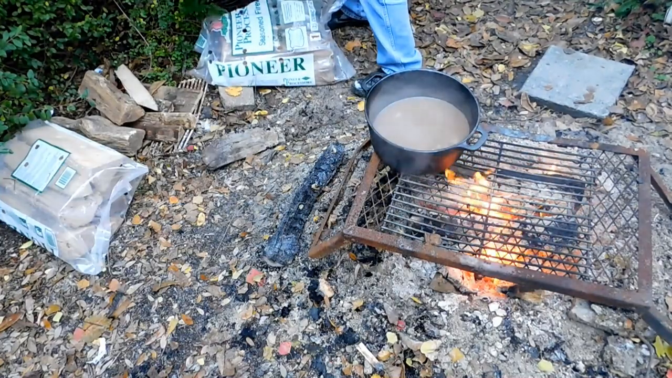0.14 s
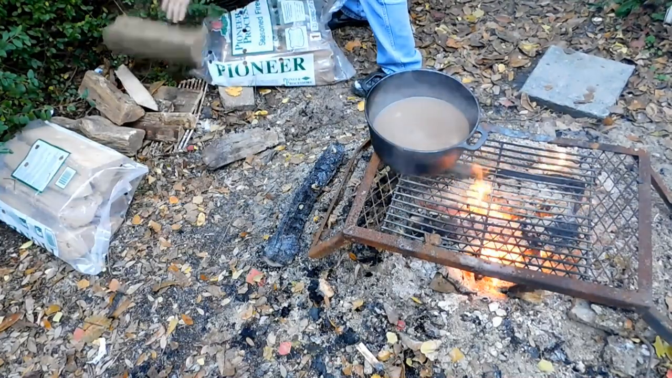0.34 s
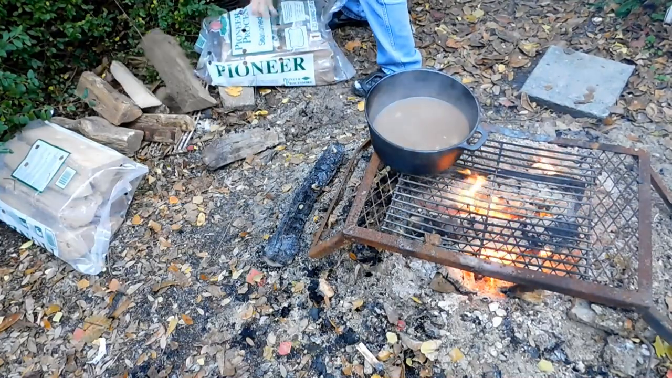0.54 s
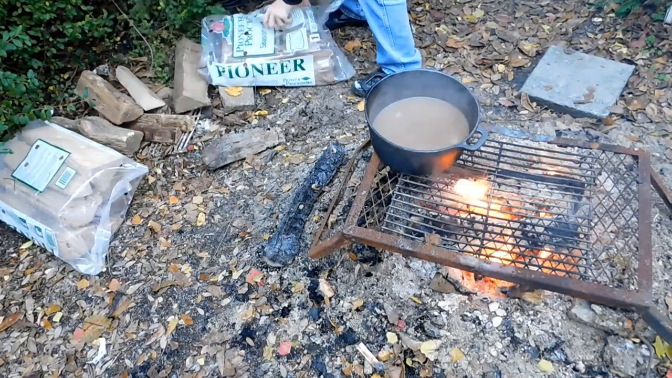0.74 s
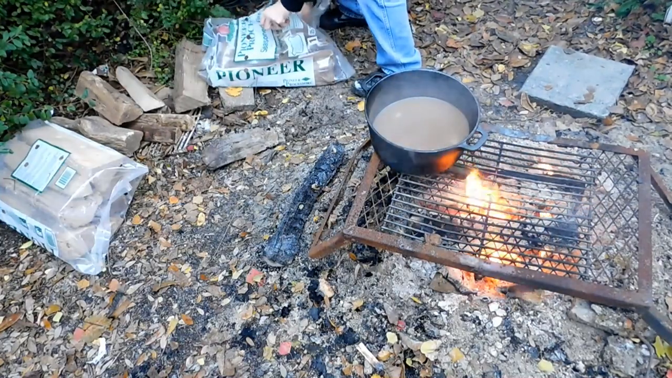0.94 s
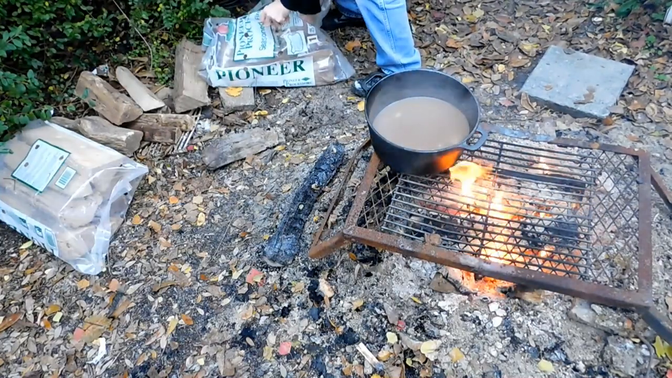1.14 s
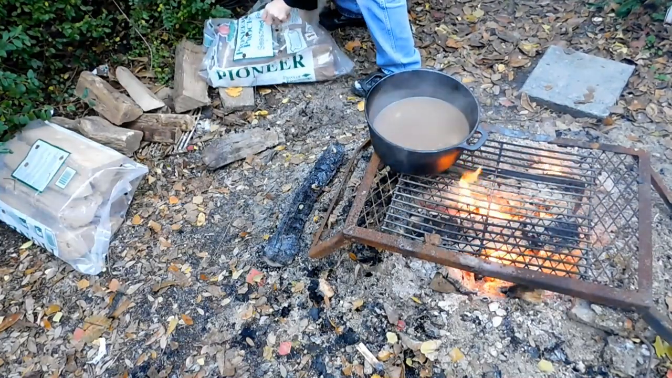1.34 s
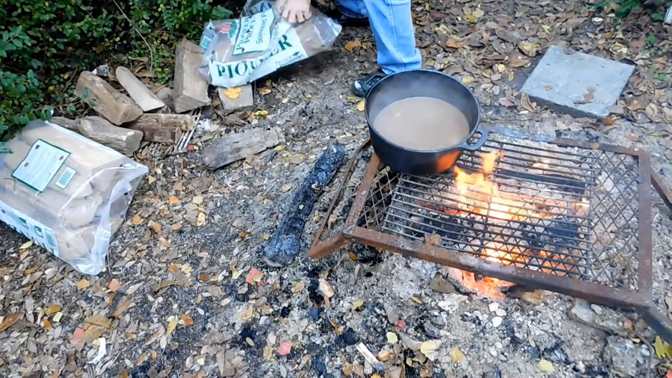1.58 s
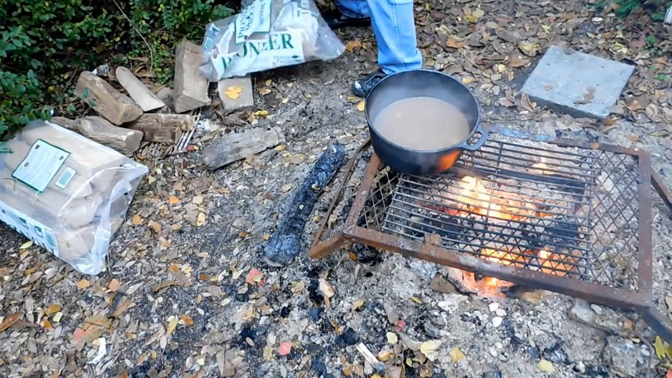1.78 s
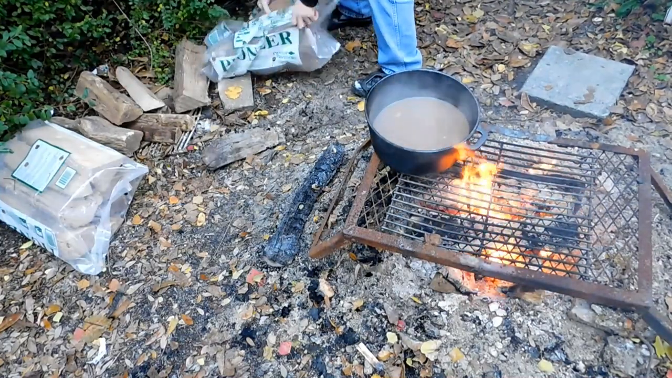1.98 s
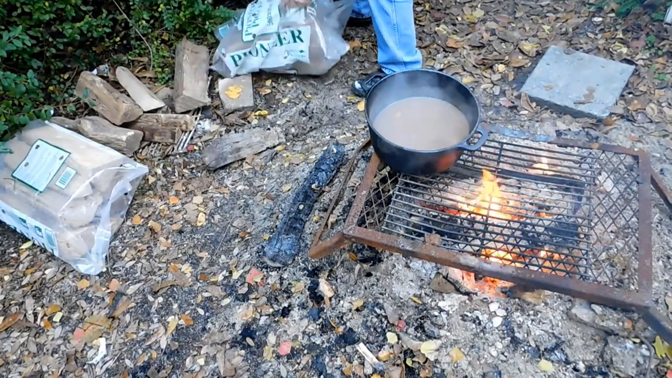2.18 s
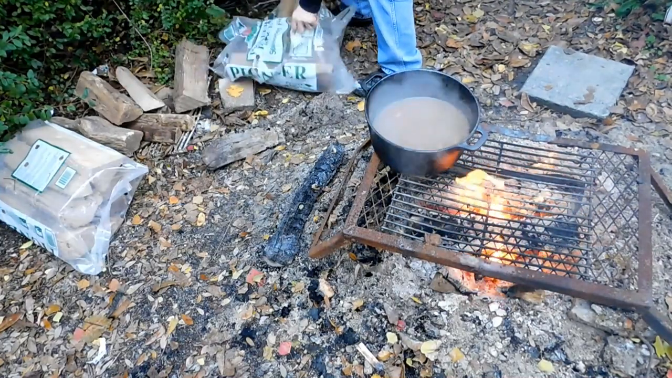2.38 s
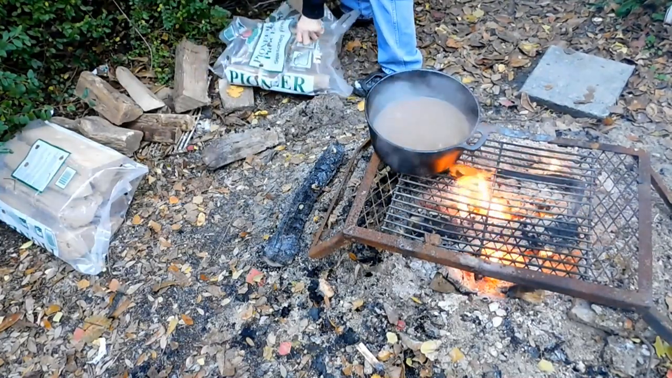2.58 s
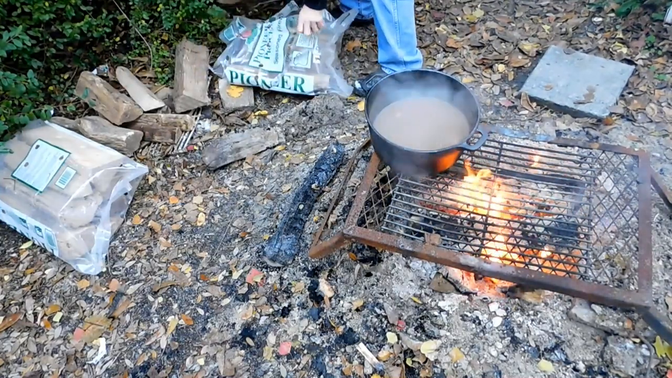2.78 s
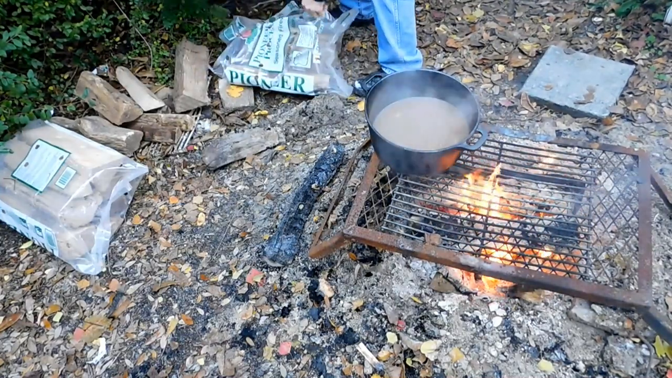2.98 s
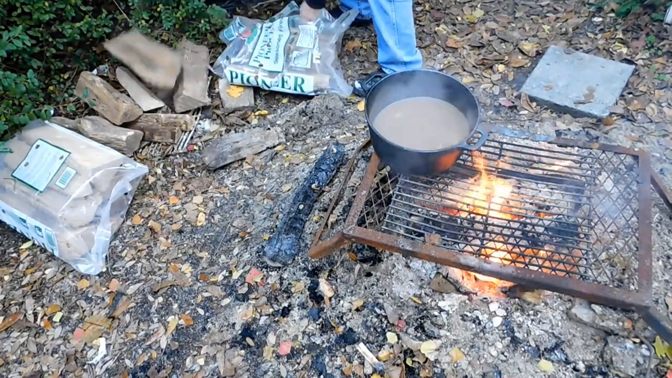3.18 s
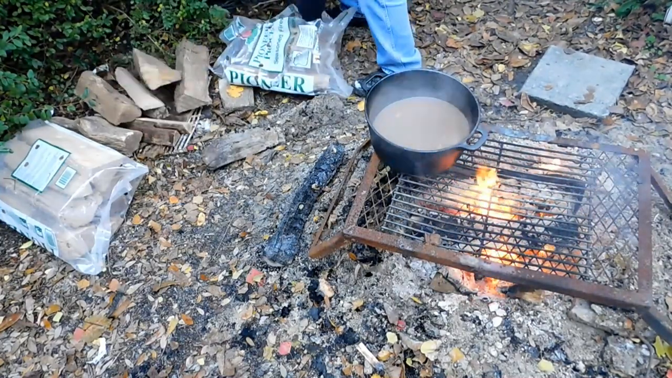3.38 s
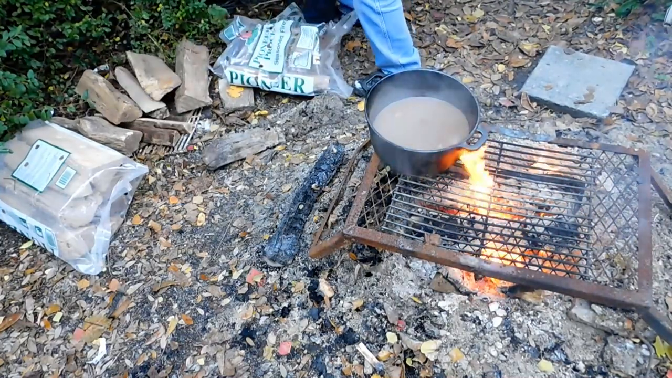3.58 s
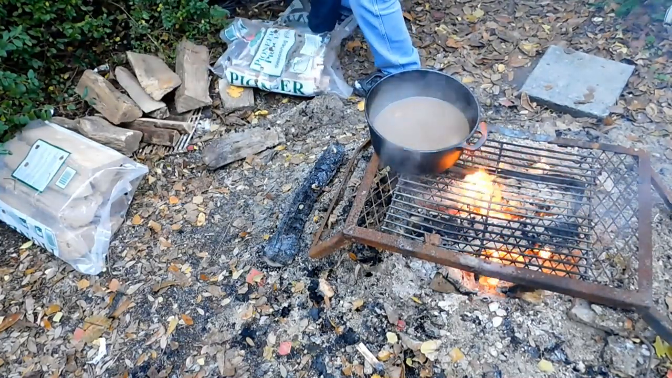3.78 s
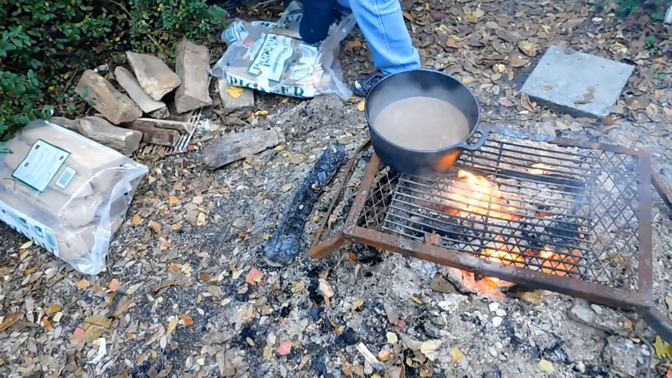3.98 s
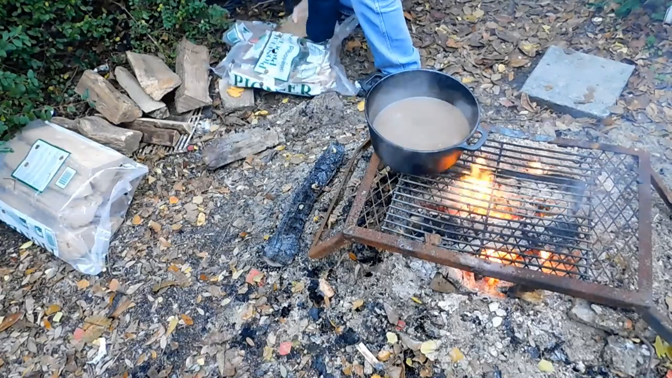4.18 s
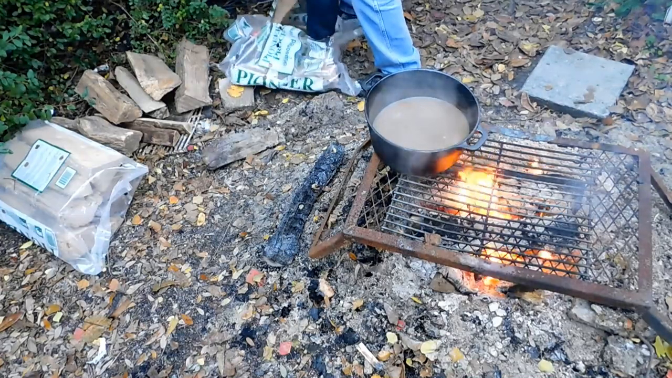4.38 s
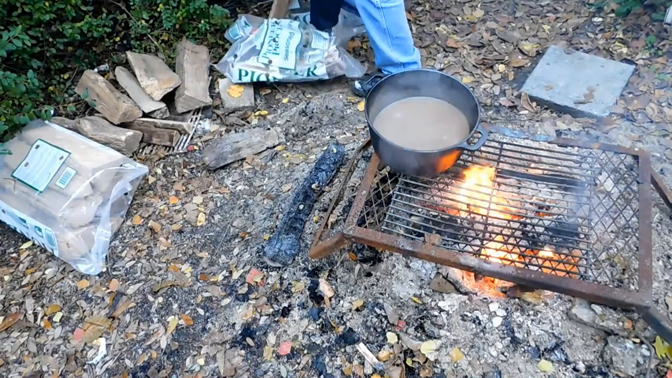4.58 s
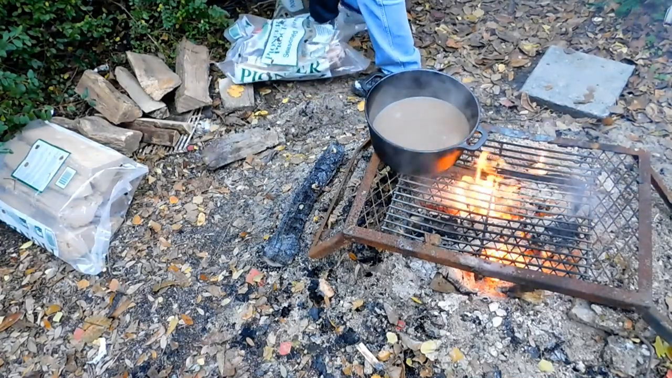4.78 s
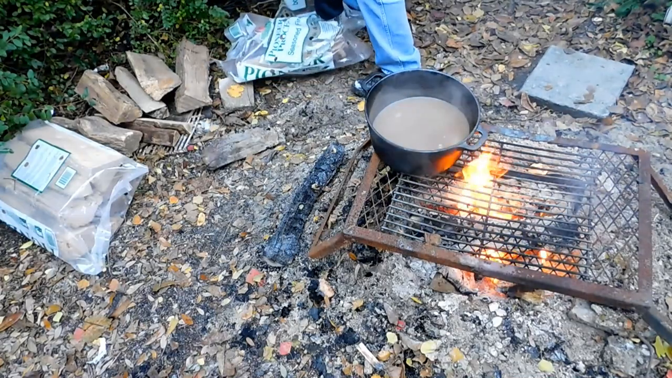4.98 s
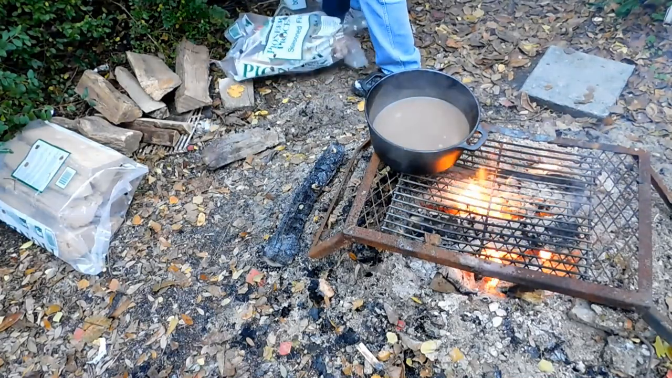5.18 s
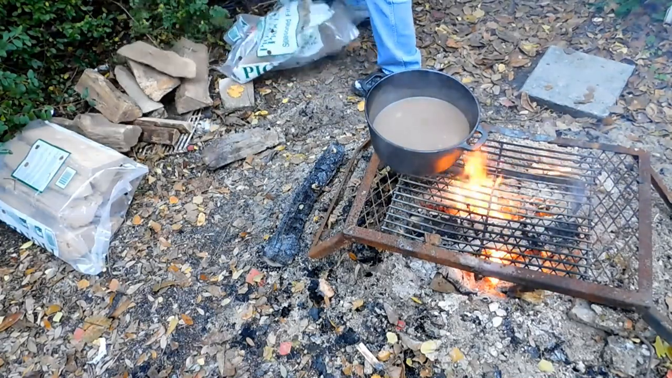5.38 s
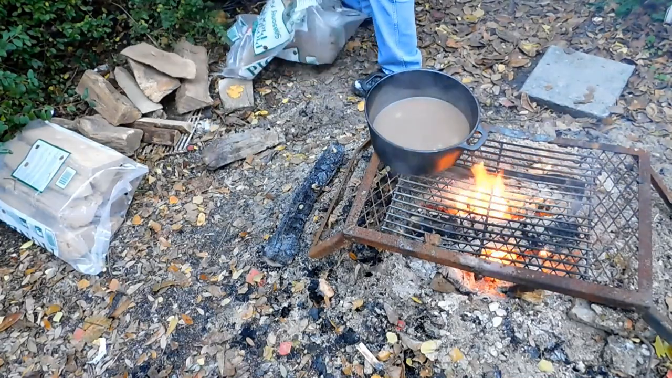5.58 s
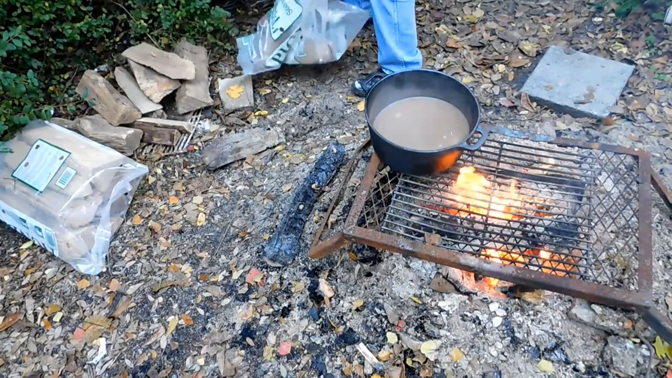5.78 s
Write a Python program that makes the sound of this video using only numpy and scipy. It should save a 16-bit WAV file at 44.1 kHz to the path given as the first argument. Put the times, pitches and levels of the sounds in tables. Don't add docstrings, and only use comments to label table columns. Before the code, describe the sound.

Split logs drop on a woodpile with hard, hollow knocks while a woven plastic sack crinkles and snaps, over faint distant traffic outdoors.

```python
import sys
import numpy as np
from scipy import signal
from scipy.fft import rfft, irfft
from scipy.io import wavfile
from scipy.ndimage import uniform_filter1d

SR = 44100
rng = np.random.default_rng(int(sys.argv[2]) if len(sys.argv) > 2 else 0)


def gain_from_db(level_db):
    decades = np.asarray(level_db, float) / 20
    return 10 ** decades


def generate_wav(signal):
    frames = np.transpose(np.atleast_2d(signal))
    scaled = np.clip(frames, -1, 1) * 32767
    pcm = np.round(scaled).astype(np.int16)
    wavfile.write(sys.argv[1], SR, pcm)


N = 257544


def colour(x, points, lo=0, hi=1):
    size = x.shape[-1]
    f = np.maximum(np.arange(size // 2 + 1) * SR / size, 1)
    hz, db = np.transpose(points)
    spec = rfft(x) * gain_from_db(np.interp(np.log(f), np.log(hz), db))
    if lo:
        inside = (f > lo) & (f < hi)
        band_power = np.mean(np.sum(np.abs(spec[..., inside]) ** 2, axis=-1))
        spec = spec * size / np.sqrt(2 * band_power)
    return irfft(spec, size)


def band(x, hz, octaves):
    edges = np.clip(hz * 2 ** (np.array([-.5, .5]) * octaves), 10, .47 * SR)
    return signal.sosfilt(signal.butter(2, edges, "bandpass", fs=SR, output="sos"), x)


def ring(hz, t60, rise, phase=0., size=SR // 8):
    t = np.arange(size) / SR
    decay = np.exp(-np.log(1000) * t / t60)
    return np.sin(2 * np.pi * hz * t + phase) * decay * (1 - np.exp(-t / rise))


def walk(rate, size=N):
    k = int(SR / rate)
    held = np.repeat(rng.standard_normal(size // k + 1), k)
    return 2.2 * uniform_filter1d(uniform_filter1d(held, k), k)[:size]


def curve(table):
    s, *columns = np.transpose(table)
    return [np.interp(np.arange(N) / SR, s, c) for c in columns]


def swells(s, db, fade_s, rise, rest_db):
    crest = 0.15
    times = np.arange(0, N, 64)
    late = (times / SR - s[:, None]) / fade_s[:, None]
    away = np.hypot(np.maximum(late, -late / np.reshape(rise, (-1, 1))), crest) - crest
    power = gain_from_db(2 * (db[:, None] - 20 * away)).sum(0) + gain_from_db(2 * rest_db)
    return np.interp(np.arange(N), times, 10 * np.log10(power))


def grains(rate_hz, size_db, cap_db):
    count, train = int(rate_hz * N / SR), np.zeros((2, N))
    size_db = np.minimum(size_db * rng.exponential(size=(2, count)), cap_db)
    size = gain_from_db(size_db) * rng.choice([-1, 1], (2, count))
    np.put_along_axis(train, rng.integers(0, N, (2, count)), size, axis=1)
    return train / train.std()


def ports(mid, other):
    # pitch_hz, level_db
    spread = [(60, -65), (250, -24.5), (700, -14), (1300, -9), (2400, -5.5), (5000, -2), (16000, 0.5)]
    side = colour(other, spread)
    return np.array([mid + side, mid - side])


def half_alike(mid, other):
    return np.array([mid + .5 * other, mid - .5 * other])


def add(out, s, sound):
    i = int(s * SR)
    out[..., i:i + sound.shape[-1]] += sound[..., :N - i]


def logs():
    # pitch_hz, level_db, t60_s
    pile_modes = [(249, -19.5, 0.062), (480, -5.5, 0.032), (680, -15, 0.032), (810, -0.5, 0.049),
                  (870, -8, 0.07), (1140, 1, 0.022), (1360, -0.5, 0.027), (1700, -1, 0.018),
                  (2090, 0.5, 0.0077), (2765, -4, 0.013), (3200, -18.5, 0.035)]
    # start_s, peak_db, low_ring_hz, upper_ring_db re low, crack_db re low
    side_blows = [(0.467, -2.5, 922, -0.5, -23), (.513, -6, 780, 8.5, -43), (0.5921, -18, 750, -30, -55),
                  (0.672, -23, 700, -5, -30), (0.7112, -25, 860, 8, -18), (0.9158, -30, 1110, 8, -22),
                  (3.2741, -3, 773, -21, -23), (3.2908, -9, 950, 10.5, -25), (3.308, -26, 935, -22, -30),
                  (3.317, -34, 816, 24, -30), (3.4595, -21.5, 916, -21, -37),
                  (3.5198, -20.5, 760, -11, -23), (3.524, -22.5, 322, -15, -38),
                  (3.941, -32.5, 480, -15, -20), (4.489, -27.5, 557, -25, -19),
                  (4.681, -30.5, 404, -11, -22), (5.3893, -6.5, 900, -12, -60), (5.408, -15.5, 895, 6, -38),
                  (5.425, -16.5, 876, -8, -35), (5.438, -17, 860, -7, -43), (5.466, -21, 864, 5.5, -35),
                  (5.549, -25, 600, -3, -13)]
    # start_s, peak_db, low_ring_hz, upper_ring_db re low, crack_db re low
    end_blows = [(0.4694, -2.5, 627, -4, -55), (0.479, -8, 900, -30, -28), (.493, -9, 880, -23, -27),
                 (0.534, -15, 920, -22, -44), (0.5996, -18, 880, -7, -51), (0.676, -17.5, 755, 2, -43),
                 (0.7134, -10.5, 825, 4.5, -21.5), (3.2772, -4, 970, -34.5, -30),
                 (3.2835, -15.5, 870, 9.5, -20), (3.4552, -21.5, 435, -8, -42),
                 (5.4031, -5, 1620, 3.5, -26.5)]
    side_ring_hz, end_ring_hz = 1400, 2140
    out, t = np.zeros((2, N)), np.arange(SR // 8) / SR
    blows = [(*b, side_ring_hz) for b in side_blows] + [(*b, end_ring_hz) for b in end_blows]
    chance = rng.standard_normal((len(blows), len(pile_modes) * 2))
    for (s, db, low_hz, high_db, crack_db, high_hz), luck in zip(blows, chance):
        knock = 1.6 * ring(low_hz, .02, .002) + gain_from_db(high_db + 5) * ring(high_hz, .009, .001)
        pile = sum(gain_from_db(mode_db + 2.8 * a) * ring(hz * (1 + 0.033 * b), t60, 0.00043, 3 * b)
                   for (hz, mode_db, t60), a, b in zip(pile_modes, luck[::2], luck[1::2]))
        burst = rng.standard_normal((2, len(t))) * np.exp(-t / .0016) * (1 - np.exp(-(t / .0008) ** 2))
        crack = colour(burst, [(1500, -11.5), (3500, 3.0), (8000, -11.0), (16000, -16.0)])
        blow = knock + gain_from_db(-8.5) * pile + gain_from_db(crack_db + 25.5) * crack
        onset = blow[:, :SR // 200] * np.exp(-(t[:SR // 200] / .0011) ** 2)
        add(out, s, gain_from_db(db + 2.0) * blow)
        add(out, s, gain_from_db(db + 4.5) * yard(onset))
    return colour(out, [(50, -16), (180, -1.0)])


def free_logs():
    # start_s, peak_db, pitch_hz, t60_s
    free_rings = [(.467, -30.5, 114, 0.072), (.4775, -6, 890, 0.066), (.53, -16, 890, 0.11),
                  (.4785, -17, 840, .15), (.514, -16, 910, 0.21), (.514, -22.5, 797, 0.43),
                  (.514, -13, 1330, 0.11), (.536, -20, 1420, 0.055), (.7125, 2.5, 2330, 0.012),
                  (.7125, -4.5, 1720, 0.014), (.514, -9.5, 2270, 0.022), (.5135, -10, 1800, 0.032),
                  (.468, -3, 1820, 0.024), (.6, -19, 2000, 0.028), (.525, -25, 2400, 0.096),
                  (3.2774, -0.5, 1010, 0.019), (3.2775, -6, 850, 0.015), (3.456, -25, 1720, 0.017),
                  (3.534, -27, 1500, 0.037), (.718, -24, 1500, .12), (3.276, -23, 1790, 0.046),
                  (3.291, -26, 1500, 0.2), (3.291, -14, 931, 0.11), (3.291, -21, 620, 0.14),
                  (3.2915, -11.5, 2140, 0.028), (3.52, -27, 1130, 0.068), (3.521, -26.5, 450, 0.089),
                  (5.389, -6, 1400, 0.064), (5.404, -15.5, 888, 0.21), (5.404, -14.5, 1650, 0.12),
                  (5.404, -25, 1700, .12), (5.423, -15.5, 507, 0.024), (5.448, -19, 1330, 0.046),
                  (5.465, -15.5, 1330, 0.043)]
    lag = 0.19 * np.array([[1], [-1]])
    out = np.zeros((2, N))
    for k, (s, db, hz, t60) in enumerate(free_rings):
        add(out, s, gain_from_db(db) * ring(hz, t60, 0.00065, (-1) ** k * lag, size=SR // 3))
    return out


def yard(x, t60_low=0.27, t60_high=0.21):
    # pitch_hz, level_db
    yard_tone = [(150, -5), (400, -0.5), (700, 2.5), (870, 6), (1050, 0.5), (1500, -4.5), (2500, -2.5),
                 (3500, -3), (8000, -1.5), (16000, 0)]
    t = np.arange(SR // 3) / SR
    lumps = gain_from_db(1.5 * walk(250, size=len(t)))
    wash = colour(rng.standard_normal((2, len(t))), yard_tone)
    low = colour(wash, [(900, -3.5), (2000, -16)])
    low_tail = low * np.exp(-np.log(1000) * t / t60_low)
    high_tail = (wash - low) * np.exp(-np.log(1000) * t / t60_high)
    mid, other = (low_tail + high_tail) * lumps * (1 - np.exp(-(t / .006) ** 2))
    response = ports(mid, other) / np.sqrt(np.sum(mid ** 2))
    return signal.fftconvolve(x.mean(0)[None], response)


def scrapes():
    # start_s, level_db, length_s, resonance_hz
    strokes = [(0.603, -35.5, 0.06, 1060), (.722, -32, 0.035, 1100), (.76, -55, .14, 305),
               (1.569, -33, 0.029, 2400), (1.777, -36, 0.027, 2400), (1.983, -32, 0.025, 795),
               (2.04, -28, 0.021, 3200), (2.404, -28.5, 0.033, 1110), (2.501, -45, 0.071, 348),
               (3.53, -39.5, 0.039, 770), (3.765, -45, 0.046, 1330), (3.775, -44.5, 0.028, 480),
               (3.83, -54, 0.078, 385), (4.082, -40, .022, 1330), (4.378, -37.5, 0.04, 2010),
               (4.473, -37, 0.053, 583), (4.576, -44, 0.049, 1790), (4.83, -40.5, 0.016, 1400),
               (5.28, -41, 0.035, 1800), (5.69, -32, .012, 2000), (0.918, -47, .03, 1600),
               (5.55, -41, 0.028, 696), (3.31, -38.5, 0.14, 1290)]
    slips_hz, width_octaves = 900, 0.54
    out, t = np.zeros((2, N)), np.arange(SR // 4) / SR
    for s, db, length_s, hz in strokes:
        when, size, other = rng.random(len(t)), rng.standard_normal(len(t)), rng.standard_normal(len(t))
        clicks = (when < slips_hz / SR) * size * np.array([np.ones(len(t)), other])
        slips = band(clicks, hz, width_octaves)
        press = np.sqrt(np.sin(np.pi * np.clip(t / length_s, 0, 1)) + 1e-9)
        add(out, s, gain_from_db(db) * ports(*(slips * press / slips.std())))
    return out


def snaps(rows):
    out, t = np.zeros((2, N)), np.arange(SR // 8) / SR
    click_tone = [(1200, -11.0), (3200, 6.5), (6000, 1.5), (12000, -6.0), (16000, -15)]  # (Hz, dB)
    flip = np.exp(-np.abs(t - .001) / np.where(t < .001, .00005, .0005))
    for s, db, hz, treble_db in rows:
        click = colour(half_alike(*(rng.standard_normal((2, len(t))) * flip)), click_tone)
        panel = 1.3 * ring(hz, .011, .0008)
        panel = panel + gain_from_db(-4) * ring(1.44 * hz, .008, .0006) + gain_from_db(-6) * ring(.57 * hz, .008, .0008)
        add(out, s - .0008, gain_from_db(db) * (panel + gain_from_db(treble_db + 15.5) * click / np.abs(click).max()))
    return out


def creases():
    # start_s, peak_db, panel_hz, treble_db re panel
    drag_snaps = [(0.6525, -33, 2300, -6), (0.8397, -29, 1290, -24), (0.8788, -24, 2360, -29),
                  (0.8885, -20.5, 1960, -7), (0.897, -26, 2120, -9), (1.1318, -31, 2050, -18),
                  (1.1655, -28, 2320, -28), (1.4531, -17.5, 1770, -28), (1.4672, -12, 2340, -15),
                  (1.5082, -35, 2580, -4), (1.5409, -21.5, 1830, -9.5), (1.559, -16.5, 2420, -12),
                  (1.6127, -19.5, 1980, -24), (1.713, -24, 2100, -24), (1.852, -11.5, 2110, -9.5),
                  (1.8933, -21.5, 1454, -23), (1.9789, -15, 2960, -9.5), (2.0017, -26, 2200, -4.5),
                  (2.024, -18, 1500, -23), (2.0316, -12.5, 3060, -13.5), (2.0454, -31, 1360, -2.5),
                  (2.0942, -20, 2160, -10), (2.1904, -21.5, 1140, -32), (2.2171, -19, 2530, -17),
                  (2.2751, -20.5, 1980, -4.5), (2.385, -16.5, 2550, -12.5), (2.4104, -15.5, 1090, -17),
                  (2.4634, -18.5, 1700, -9.5), (2.4992, -17.5, 2110, -20), (2.5519, -24, 1440, -34)]
    # start_s, peak_db, panel_hz, treble_db re panel
    reach_snaps = [(3.7548, -32, 1130, -21), (4.003, -35, 1700, -10), (4.084, -37, 1240, -25),
                   (4.1532, -25, 2460, -22), (4.254, -27, 1930, -12), (4.3799, -17.5, 1940, -29),
                   (4.4295, -34, 1440, -8), (4.504, -24, 1270, -18), (4.561, -26, 1410, -19),
                   (4.679, -27, 1110, -23), (4.7033, -24.5, 1550, -37), (4.7496, -30, 1970, -17),
                   (4.8146, -18.5, 2340, -40), (4.8518, -28, 1440, -20), (4.8771, -24, 1800, -16.5),
                   (4.8982, -27, 1700, -32), (4.944, -25.5, 2520, -24), (5.027, -29.5, 2510, -21),
                   (5.101, -25.5, 2170, -15.5), (5.211, -26, 1770, -39), (5.319, -32.5, 2400, -0.5),
                   (5.3645, -21, 1950, -37), (5.5316, -18.5, 1010, -18), (5.584, -18.5, 2230, -16),
                   (5.6298, -37, 1000, -27), (5.689, -18, 1820, -25), (5.7381, -14.5, 2230, -19),
                   (5.775, -35, 1200, -37), (5.831, -12.5, 2000, -20.5)]
    # start_s, peak_db
    ticks = [
        (0.055, -43.5),
        (0.372, -55),
        (0.1974, -43),
        (0.21, -45),
        (0.333, -44),
        (0.9607, -28.5),
        (2.8401, -52),
    ]
    tick_hz, tick_treble_db = 1200, -13
    return snaps([*drag_snaps, *reach_snaps, *((*tick, tick_hz, tick_treble_db) for tick in ticks)])


def crackle():
    # start_s, peak_db, panel_hz, treble_db re panel
    drag_crackle = [(1.384, -39, 1240, -9), (1.405, -32.5, 1050, -15), (1.439, -30, 1750, -18),
                    (1.4645, -18, 1520, -16.5), (1.577, -19, 2400, -26), (1.594, -25, 1694, -14),
                    (1.649, -25, 2240, -14), (1.695, -27, 2350, -16), (1.727, -21, 2700, -23),
                    (1.754, -22, 2710, -24), (1.789, -21, 2530, -20), (1.811, -26, 1540, -18),
                    (1.829, -24, 2290, -25), (1.91, -22, 1854, -30), (1.929, -22.5, 2454, -17),
                    (1.981, -15, 1070, -28), (2.05, -24, 1380, -18), (2.077, -22, 1450, -9),
                    (2.128, -25, 2520, -23), (2.17, -36, 2420, -15), (2.232, -25, 1205, -9),
                    (2.232, -14.5, 2490, -18), (2.315, -33, 2060, -26), (2.336, -29, 920, -26),
                    (2.37, -22, 2820, -18), (2.417, -19, 1220, -23), (2.448, -27, 1290, -29),
                    (2.459, -24, 2090, -18), (2.481, -20, 1760, -26), (2.512, -17.5, 1820, -19)]
    # start_s, peak_db, panel_hz, treble_db re panel
    reach_crackle = [(3.733, -31.5, 1650, -20), (3.762, -33, 1320, -25), (3.786, -33, 1230, -27),
                     (3.797, -29, 1230, -30), (3.821, -38, 2300, -21), (3.887, -41, 807, -9),
                     (3.989, -36, 2060, -22), (4.019, -27, 1910, -15), (4.097, -30, 1270, -15),
                     (4.121, -27, 1690, -27), (4.138, -41, 2570, -24), (4.155, -22, 2630, -15),
                     (4.359, -27, 1990, -16.5), (4.391, -24, 1730, -25), (4.435, -25, 1780, -22),
                     (4.45, -32, 1870, -24), (4.471, -27, 795, -20), (4.584, -29, 1780, -26),
                     (4.733, -37, 1170, -22), (4.803, -26, 2530, -28), (4.843, -26.5, 1210, -23),
                     (4.923, -29, 2450, -21), (4.98, -33, 2570, -22), (5.076, -33.5, 900, -21),
                     (5.243, -30, 810, -29), (5.279, -37, 2430, -24), (5.286, -26, 1790, -20),
                     (5.551, -19, 1430, -27), (5.565, -28, 2110, -11), (5.703, -33, 2080, -22),
                     (5.715, -27, 2190, -30), (5.798, -22, 2050, -16)]
    return gain_from_db(-0.5) * snaps([*drag_crackle, *reach_crackle])


def settling():
    # start_s, peak_db, panel_hz, treble_db re panel
    relaxing = [
        (0.1656, -36.5, 2480, -12),
        (0.2694, -56, 1570, -12),
        (0.8604, -33, 2550, -13),
        (0.9328, -36, 1640, -12),
        (0.953, -34, 2480, -14),
        (1.0789, -46, 2710, -7),
        (2.6695, -45, 1740, -12),
        (2.871, -42, 900, -20),
        (5.631, -27, 2980, -18),
    ]
    return snaps(relaxing)


def sack(patchy_db=1.2):
    # pitch_hz, level_db per Hz
    sack_tone = [(150, -5), (300, -4), (700, 2.5), (1100, 5), (2300, 5.5), (3300, -5.5), (5500, -11),
                 (12000, -16), (16000, -18.5)]
    # strain_peak_s, crinkle_db, fade_s, hiss_db re crinkle
    drag_pulls = [(.2, -57, 0.18, -11), (.28, -66, 0.1, 4), (.675, -36, 0.13, -2), (.76, -49.5, 0.072, 3),
                  (.82, -63, 0.091, -7), (.896, -37.5, 0.2, -14), (1.16, -49, 0.26, -6.5),
                  (1.43, -42, 0.16, -11), (1.565, -30.5, 0.14, -8.5), (1.794, -28, 0.16, -7.5),
                  (1.93, -38, 0.1, -5), (2.04, -28, 0.15, -11.5), (2.2, -34.5, 0.14, -6.5),
                  (2.285, -30, 0.15, -9), (2.406, -24, 0.083, -14.5), (2.49, -29.5, 0.093, -13),
                  (2.55, -32.5, 0.02, -24), (2.67, -47.5, 0.1, -6), (2.843, -68.5, 0.038, 6.5)]
    # strain_peak_s, crinkle_db, fade_s, hiss_db re crinkle
    reach_pulls = [(3.415, -40, 0.12, -5), (3.766, -41, 0.072, -13.5), (3.93, -45, 0.26, -11),
                   (4.094, -38.5, 0.23, -10), (4.24, -47, 0.22, -11), (4.41, -35.5, 0.19, -14),
                   (4.508, -36, 0.25, -9.5), (4.71, -51, 0.18, -13), (4.83, -41, 0.27, -20),
                   (4.99, -49.5, 0.24, -12), (5.086, -50, 0.077, -9), (5.2, -55.5, 0.093, -8),
                   (5.294, -38, 0.093, -12.5), (5.556, -31, 0.043, -14), (5.62, -38, 0.074, -9),
                   (5.69, -47, 0.029, 1), (5.745, -40, 0.24, -29), (5.84, -39, 0.11, -6)]
    # start_s, crinkle_db, fade_s, hiss_db re crinkle
    jolts = [
        (.475, -48, 0.19, 6.5),
        (3.28, -38, 0.19, -6.5),
        (3.458, -40.5, 0.13, -4.5),
        (3.521, -35.5, 0.039, -10),
        (5.393, -37, 0.94, -8.5),
        (1.98, -32, 0.14, -10),
        (4.381, -34.5, 0.049, -11),
    ]
    s, pull_db, fade_s, hiss_db = np.transpose([*drag_pulls, *reach_pulls, *jolts])
    counts = [len(drag_pulls), len(reach_pulls), len(jolts)]
    shift_db = np.repeat([-13.5, -9.5, -23], counts)
    rise = np.repeat([0.86, 0.86, 0.13], counts)
    crinkle_db = swells(s, pull_db, fade_s, rise, rest_db=-69.5)
    treble_db = swells(s, pull_db + hiss_db, fade_s, rise, rest_db=-91)
    bass_db = swells(s, pull_db + shift_db, fade_s, rise, rest_db=-69.5)
    surge, shared = walk(70), grains(260, 4, 11)
    shared[1] = shared[0] * rng.standard_normal(N)
    tone_hz, tone_db = np.transpose(sack_tone)
    layers = np.zeros((3, 2, N))
    for hz in 180 * 2 ** np.arange(0, 6.6, .5):
        layer = int(hz > 550) + int(hz > 3000)
        grit = .8 * shared + (.7, .8, .4)[layer] * grains(300, 4.5, 12)
        grit = grit + gain_from_db((-4, -8, -2)[layer]) * rng.standard_normal((2, N))
        db = np.interp(np.log(hz), np.log(tone_hz), tone_db) + patchy_db * (surge + walk(60))
        layers[layer] += band(grit, hz, 0.66) * gain_from_db(db)
    levels = (bass_db, crinkle_db - .7, treble_db + 0.5)
    mid, other = sum(x / x.std() * gain_from_db(db) for x, db in zip(layers, levels))
    return ports(mid, other)


def threads():
    # start_s, peak_db, pitch_hz
    partings = [(.468, -18, 4270), (1.852, -15, 11400), (1.962, -26, 14000), (2.032, -16, 4000),
                (2.832, -45, 11000), (2.94, -52, 12000), (3.223, -56, 6000), (4.733, -39, 5600),
                (4.851, -38, 7000), (5.027, -40, 5500), (3.277, -16, 3300)]
    out, t = np.zeros((2, N)), np.arange(SR // 50) / SR
    for s, db, hz in partings:
        mid, other = band(rng.standard_normal((2, len(t))) * np.exp(-t / 0.00089), hz, 0.7)
        add(out, s, gain_from_db(db) * half_alike(mid, other) / np.abs(mid).max())
    return out


def town():
    # pitch_hz, level_db per Hz
    traffic_tone = [(20, 3), (60, 8.5), (130, -0.5), (450, -1.5), (800, 2.5), (1300, 0), (1800, -5.5),
                    (2600, -14.5), (4000, -24.5), (6500, -35), (13000, -32), (16000, -35)]
    # time_s, pitch_hz, level_db
    engine = [(0, 84.5, -61.5), (.45, 87.5, -58.5), (1, 93, -59.5), (1.8, 94, -64), (2.4, 93, -49),
              (3, 93.4, -53.5), (3.25, 92.6, -56), (4, 93.7, -67), (4.4, 97, -69), (5.84, 93.5, -72)]
    # peak_s, peak_db, fade_s
    gust_rows = [(0, -65, 0.59), (.45, -51, 0.068), (.9, -45.5, 0.31), (1.5, -57, 0.31), (2.391, -67, .4),
                 (2.7, -62, 0.84), (3.4, -58, 0.83), (4.26, -51.5, 0.7), (4.68, -48, 0.3),
                 (4.85, -56, 0.24), (5.1, -62, 0.33), (5.7, -70, .4)]
    traffic_db = -52.5 + 0.12 * walk(1.22)
    mid, other = colour(rng.standard_normal((2, N)), traffic_tone, 120, 16000) * gain_from_db(traffic_db)
    hz, hum_db = curve(engine)
    turns = np.cumsum(hz + 1.16 * walk(38.7)) / SR
    hum = np.sqrt(2) * gain_from_db(hum_db + 0.34 * walk(4.1)) * np.sin(2 * np.pi * turns)
    wind_tone = [(12, -17), (25, 3.5), (45, -4.0), (75, -9.5), (120, -9.5), (300, -34.5)]  # (Hz, dB)
    gusts = colour(rng.standard_normal((2, N)), wind_tone, 6.7, 79)
    gust_db = swells(*np.transpose(gust_rows), rise=0.38, rest_db=-65.5)
    wind = gain_from_db(gust_db) * half_alike(*gusts)
    return ports(mid, 1.67 * other) + hum + wind


def with_scatter(x):
    return x + gain_from_db(-6.5) * yard(x, t60_low=0.039, t60_high=0.013)[:, :N]


def scene():
    wood = logs() + free_logs() + scrapes()
    plastic = with_scatter(creases()) + with_scatter(crackle()) + settling() + sack() + threads()
    return wood + plastic + town()


def roll_off(x):
    return signal.sosfilt(signal.butter(12, 16960, fs=SR, output="sos"), x)


def record(dry):
    # pitch_hz, level_db
    lean = [(100, -1), (1300, -.5), (2400, -1.5), (8000, -1), (16000, -4.5)]
    # pitch_hz, level_db
    mic = [(14800, -1.5), (15800, -7), (16150, -46)]
    left, right = colour(dry, mic)
    left = colour(left, [(hz, db / 2) for hz, db in lean])
    right = colour(right, [(hz, -db / 2) for hz, db in lean])
    return roll_off(np.clip([left, right], -1, 1))


dry = scene()
out = record(dry)
generate_wav(out)
```